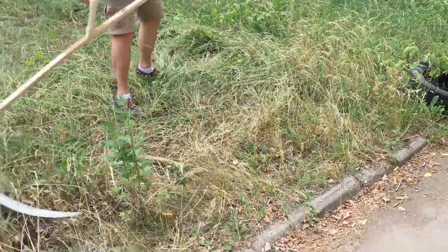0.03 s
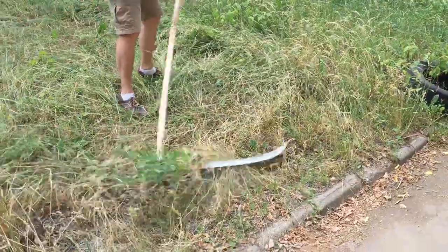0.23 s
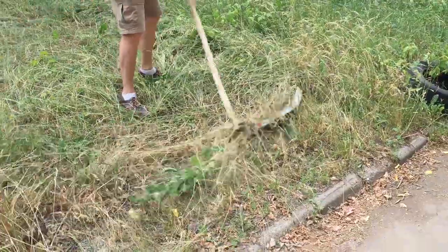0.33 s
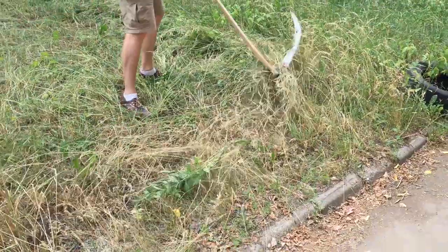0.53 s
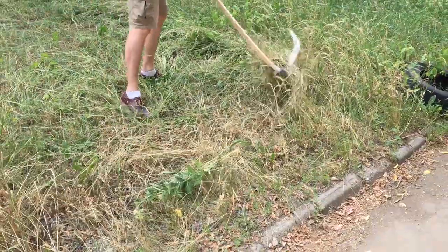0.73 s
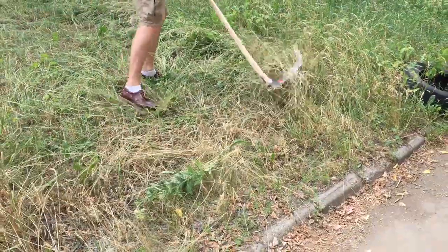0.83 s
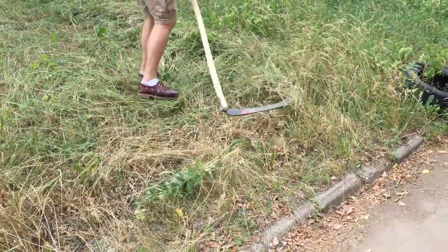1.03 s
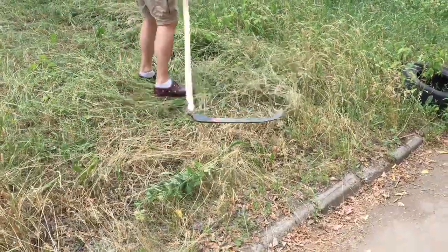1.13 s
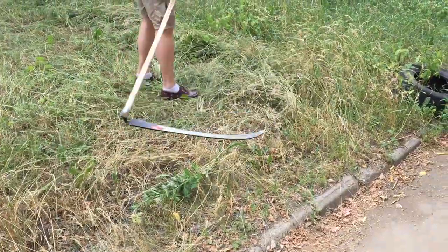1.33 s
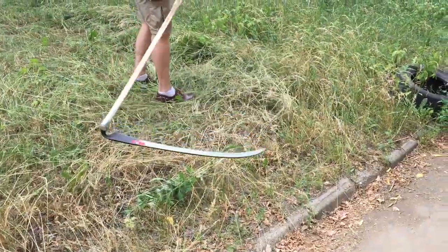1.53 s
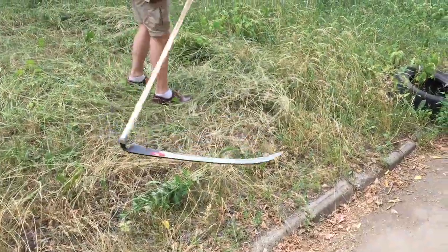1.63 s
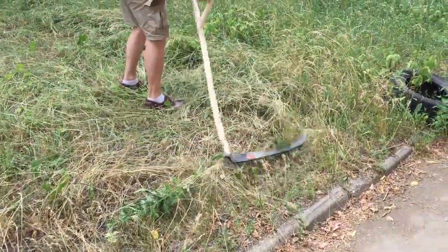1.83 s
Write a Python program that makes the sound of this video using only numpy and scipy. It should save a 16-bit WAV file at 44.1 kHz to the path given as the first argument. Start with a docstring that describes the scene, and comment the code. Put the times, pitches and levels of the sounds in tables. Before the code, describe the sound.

A scythe swishes through dry grass, snapping stems, then rustles faintly as it draws back.

```python
"""Wind bumps softly on the microphone over a low outdoor hum. A scythe sweeps into dry grass and weeds:
stalks brush the blade in a swelling swish and bow the steel into a faint ring. At the height of the
stroke, around 0.35 s, stems snap sharply and the thick ones knock on the blade. The swish dies away by
0.8 s, then the grass rustles and crackles as the blade is drawn back."""
import sys
import numpy as np
from scipy import signal
from scipy.fft import rfft, irfft
from scipy.io import wavfile
from scipy.ndimage import uniform_filter1d, map_coordinates

SR = 44100
rng = np.random.default_rng(int(sys.argv[2]) if len(sys.argv) > 2 else 0)


def master(y):
    """Save y as 16-bit WAV."""
    cut = np.clip(np.atleast_2d(y).T, -1, 1)
    pcm = np.round(cut * 32767)  # scale
    wavfile.write(sys.argv[1], SR, pcm.astype(np.int16))


N = 83790


def amp(db):
    return 10 ** (np.asarray(db) / 20)


def unit_rms(x):
    return x / np.sqrt(np.mean(x ** 2) + 1e-20)


def automation(table, column):
    """One column of a table of timed breakpoints, drawn out to every sample."""
    rows = np.array(table)
    return np.interp(np.arange(N) / SR, rows[:, 0], rows[:, column])


def equalise(x, curve, outside_db=None):
    """EQ through (Hz, dB) points; beyond them the end gains hold unless outside_db is given."""
    hz, db = np.transpose(curve)
    log_hz = np.log(np.fft.rfftfreq(N, 1 / SR) + 1)
    gain_db = np.interp(log_hz, np.log(hz), db, outside_db, outside_db)
    return irfft(rfft(x) * amp(gain_db), N)


def coloured(x, curve):
    """A band of x shaped by an EQ curve, at unit RMS."""
    return unit_rms(equalise(x, curve, outside_db=-60))


def patchy(x, depth_db, frames, bins, size=256):
    """Random louder and softer patches over time and frequency, at unit RMS."""
    spectra = signal.stft(x, nperseg=size)[2]
    patches = uniform_filter1d(rng.standard_normal(spectra.shape), bins, axis=0)
    patches = unit_rms(uniform_filter1d(patches, frames, axis=1))
    return unit_rms(signal.istft(spectra * amp(depth_db * patches), nperseg=size)[1][:N])


def resonate(x, hz, width_hz):
    """A single resonance with a gain of about 1 at its centre."""
    carrier = np.exp(2j * np.pi * hz * np.arange(1, len(x) + 1) / SR)
    pole = np.exp(-np.pi * width_hz / SR)
    return 2 * (carrier * signal.lfilter([1 - pole], [1, -pole], x / carrier + 1e-18)).real


def place(mix, start_s, sound):
    part = mix[round(start_s * SR):][:len(sound)]
    part += sound[:len(part)]


def outdoor_hum():
    """A low, steady bed of distant outdoor noise."""
    # Each row: frequency in Hz, relative level in dB.
    spectrum = [(18, -29), (30, -3), (114, -4.5), (272, -4.5), (363, -12), (798, -15.5), (1500, -20.5),
                (1620, -45), (1950, -48.5), (6350, -57), (15900, -33)]
    bed = coloured(rng.standard_normal(N), spectrum)
    return amp(-60.5) * patchy(bed, depth_db=0.92, frames=14, bins=2)


def wind():
    """Low, lumpy buffeting on the microphone, dulled by its cover."""
    # Each row: time in seconds, gust level in dB ahead of the cover.
    gusts = [(0.0, -73), (0.036, -48), (0.088, -69), (0.116, -58), (0.2, -62), (0.238, -51), (0.268, -66),
             (0.37, -55), (0.396, -63), (0.518, -54.5), (0.534, -74), (0.566, -53.5), (0.624, -53.5),
             (0.714, -58), (0.756, -51), (0.776, -57), (1.1, -62), (1.126, -42.5), (1.142, -35),
             (1.164, -76), (1.19, -45), (1.27, -51.5), (1.3, -39), (1.354, -69), (1.406, -49.5),
             (1.438, -70), (1.512, -53.5), (1.55, -61), (1.708, -56.5), (1.74, -73), (1.804, -58),
             (1.852, -45), (1.878, -56), (1.9, -37.5)]
    centre_hz, width_hz = 74.7, 51
    rumble = resonate(rng.standard_normal(N), centre_hz, width_hz)
    rumble = resonate(rumble, centre_hz, 2 * width_hz)
    # Compress the rumble so that the gusts shape the bumps.
    power = uniform_filter1d(rumble ** 2, size=700) + 0.018 * np.mean(rumble ** 2)
    rumble = unit_rms(rumble / np.sqrt(power))
    cover = signal.butter(3, [30, 170], "band", fs=SR, output="sos")
    return signal.sosfiltfilt(cover, amp(automation(gusts, 1)) * rumble)


def stalk_friction():
    """Stalks brushing steel: tiny uneven ticks in noise, streaked with narrow, lingering whistles."""
    ticks_per_s, spread_db, tick_share = 2700, 2, 0.44
    sizes = amp(spread_db * np.minimum(rng.exponential(1, N), 5))
    contacts = sizes * (rng.random(N) < ticks_per_s / SR)
    ticks = np.convolve(contacts, np.exp(-np.arange(40) / 7.1))[:N] * rng.standard_normal(N)
    texture = tick_share * unit_rms(ticks) + (1 - tick_share) * rng.standard_normal(N)
    return patchy(texture, depth_db=4, frames=3, bins=1, size=1024)


def ground_echo(rustle):
    """The rustle bounces off the ground; the delay shifts as the blade moves, like a light flanger."""
    # Each row: time in seconds, delay in ms, echo strength relative to the direct sound.
    bounce = [(0, .2, .1), (.06, .21, .35), (.12, .205, .65), (.19, .2, .5), (.26, .175, .4),
              (.33, .155, .4), (.42, .15, .1), (.7, .15, 0), (1.0, .086, .14), (1.5, .1, .18),
              (1.9, .1, .1)]
    read_at = np.arange(N) - automation(bounce, 1) * SR / 1000
    strength = automation(bounce, 2)
    echo = map_coordinates(rustle, [read_at], order=5)
    return (rustle + strength * echo) / np.sqrt(1 + strength ** 2)


def grass_swish():
    """Stalks brush the blade in three layers: bright fizz, mid rasp and woody body."""
    # The stroke and the draw back. Each row: time in seconds, then fizz, rasp and body levels in dB.
    stroke = [(0, -55, -61.5, -84), (.027, -56, -58, -64), (.05, -55.5, -67, -73.5),
              (.125, -54.5, -61.5, -69), (.16, -55, -57, -63.5), (.195, -41, -46.5, -55.5),
              (.25, -39, -44.5, -52), (.29, -33, -41, -44), (.33, -32.5, -40, -37), (.342, -28.5, -34, -37),
              (.365, -33, -34.5, -33.5), (.385, -32.5, -35, -39), (.40, -36, -39.5, -39.5),
              (.425, -36.5, -36, -39.5), (.455, -40, -41, -43), (.486, -35.5, -37.5, -44),
              (.535, -42.5, -44.5, -50.5), (.575, -40.5, -42.5, -48), (.625, -43.5, -47.5, -56.5),
              (.75, -54.5, -58, -66), (.80, -62, -67.5, -70), (.89, -65, -68.5, -68.5),
              (1.09, -63, -68, -77), (1.2, -58.5, -68, -72.5), (1.41, -62, -68.5, -74.5),
              (1.44, -61, -59.5, -62), (1.476, -50.5, -64, -76), (1.53, -63.5, -71.5, -75.5),
              (1.65, -65, -70, -72), (1.70, -71, -72, -78), (1.73, -63.5, -69.5, -74),
              (1.77, -75.5, -75.5, -77), (1.9, -72.5, -72.5, -70.5)]
    # The tone of each layer. Each row: frequency in Hz, relative level in dB.
    fizz_eq = [(3300, -36), (4700, -7.5), (6200, -2), (7500, -3), (9000, 0.5), (12000, -2), (14000, -2),
               (15900, -4.5)]
    rasp_eq = [(1300, -53), (1900, -5), (2400, -2), (3100, -1), (3500, -4), (4000, -2.5), (5000, -5),
               (7000, -33.5)]
    body_eq = [(300, -25.5), (550, -11.5), (850, 1), (1200, -1.5), (1650, 2.5), (1950, -9.5), (2600, -23)]
    fizz = patchy(coloured(stalk_friction(), fizz_eq), depth_db=1.3, frames=20, bins=5)
    friction = stalk_friction()
    rasp = patchy(coloured(friction, rasp_eq), depth_db=0.87, frames=10, bins=2)
    body = patchy(coloured(friction, body_eq), depth_db=1.37, frames=8, bins=2)
    layers = [ground_echo(fizz), rasp, body]
    return sum(amp(automation(stroke, column)) * layer for column, layer in enumerate(layers, 1))


def stem_snaps():
    """Each stem cracks: a broad tick, a short pitched burst, a crumbly tail and a ground bounce."""
    # Each row: start in seconds, burst level in dB, pitch in Hz, burst length in ms,
    # tick level in dB relative to the burst.
    snaps = [(0.0286, -39.5, 2670, 0.37, 2), (.3381, -15, 12000, 0.43, 0), (0.3382, -19, 13400, .3, -10),
             (.3399, -22, 13500, .25, 0), (0.3375, -26, 6000, 0.28, -4), (0.339, -21.5, 2470, 0.25, -10),
             (0.364, -29, 12400, 0.22, -8), (.38115, -6.5, 8100, .135, -2), (.3814, -22, 2000, .3, -9),
             (0.8394, -40, 11800, 0.23, -4), (1.434, -43, 12500, 0.21, -3), (1.441, -44, 2470, .48, 5.5),
             (1.4345, -50, 4200, .3, -5), (1.452, -48, 3700, 0.33, -8), (1.458, -49, 3940, 0.29, -3),
             (1.4724, -38, 12500, 0.44, 2), (1.474, -42.5, 4300, 0.23, -3), (1.542, -50.5, 8450, 0.28, 3),
             (1.557, -50, 11500, .3, -6), (1.5785, -42.5, 9400, 0.64, -3), (1.6008, -45, 12800, .3, -7),
             (1.616, -47, 12600, .3, -10), (1.6244, -45, 12700, .3, -10), (1.6381, -43, 6300, 0.61, 3.5),
             (1.652, -48, 6000, 0.23, -2), (1.6561, -42, 12400, 0.21, 0), (1.6683, -41, 12600, 0.26, -4),
             (1.6846, -57, 13000, 0.18, 11), (1.721, -59, 11800, .3, -5), (1.73235, -31.5, 9400, .28, -1),
             (1.7324, -37, 6000, .3, -9), (1.7326, -47, 3000, .5, -9), (1.741, -47, 9000, .25, -3),
             (1.7528, -54, 9000, .2, 2), (1.7915, -52.5, 6000, 0.081, 0), (1.849, -54, 9100, .2, -3),
             (1.8755, -42, 8300, 0.15, -4)]
    tail_db, tail_decay_s = -17, 0.0018
    bounce_db, bounce_delay_s = -6, 0.00024
    out, t = np.zeros(N), np.arange(800) / SR
    pulse = np.exp(-((t - 0.00007) / 0.000026) ** 2)
    tick = np.diff(pulse, prepend=0)
    tick /= tick.max()
    for start_s, db, hz, length_ms, tick_db in snaps:
        age = 2 * t / (length_ms / 1000)  # the burst peaks at age 1
        burst = np.sin(2 * np.pi * hz * t) * age * np.exp(1 - age)
        crumbs = np.diff(rng.standard_normal(len(t) + 1))
        tail = amp(tail_db) * crumbs * np.exp(-t / tail_decay_s)
        place(out, start_s, amp(db) * (burst + amp(tick_db) * tick + tail))
    return out + amp(bounce_db) * np.roll(out, round(bounce_delay_s * SR))


def blade_rings():
    """Stalks dragged along the edge bow one mode of the steel for a moment."""
    # Each row: start in seconds, length in seconds, level in dB, pitch in Hz.
    rings = [(.17, 0.11, -50, 1778), (.18, 0.075, -57, 962), (.255, 0.047, -46, 2460),
             (.29, 0.06, -49, 6130), (.325, 0.049, -42, 2407), (0.422, 0.092, -40, 1652),
             (.425, 0.022, -41, 2373), (.47, .045, -42, 2885), (.11, 0.12, -54, 4790),
             (.485, 0.023, -40.5, 3270), (.555, 0.025, -47, 2510), (.69, 0.098, -64, 2440),
             (.65, 0.094, -61.5, 2885), (.92, 0.07, -70, 2213), (1.025, 0.043, -65, 2370),
             (1.2, 0.056, -66, 2970), (1.265, .07, -70.5, 2986), (1.013, 0.083, -74, 4280),
             (1.2, 0.023, -67, 2140)]
    out = np.zeros(N)
    for start_s, length_s, db, hz in rings:
        mode = resonate(rng.standard_normal(8000), hz, width_hz=14)
        tone = unit_rms(mode[2000:][:round(length_s * SR)])  # skip the build-up
        swell = np.sqrt(np.hanning(len(tone)))
        place(out, start_s, amp(db) * swell * tone)
    return out


def stem_thuds():
    """Thick stems struck by the blade send dull knocks through steel and shaft."""
    # Each row: start in seconds, level in dB, pitch in Hz, seconds to fall by 60 dB.
    thuds = [(.30, -35, 1100, 0.14), (.338, -25.5, 1132, .06), (.345, -37, 241, 0.21),
             (.352, -29.5, 1329, .1), (.414, -30, 840, 0.046), (.32, -38, 318, 0.065),
             (.575, -34, 1430, 0.035)]
    attack_s = 0.006
    out, t = np.zeros(N), np.arange(6000) / SR
    for start_s, db, hz, t60 in thuds:
        roughness = 1 + 0.69 * unit_rms(uniform_filter1d(rng.standard_normal(len(t)), size=200))
        envelope = amp(db - 60 * t / t60) * np.minimum(t / attack_s, 1)
        place(out, start_s, envelope * roughness * np.sin(2 * np.pi * hz * t))
    return out


def scene():
    """The scythe, the wind and the hum in one mono mix."""
    scythe = grass_swish() + blade_rings() + stem_snaps() + stem_thuds()
    return (scythe + wind() + outdoor_hum())[None]


def record(dry):
    """The microphone housing colours the mix, and a steep low-pass cuts it off at 16 kHz."""
    # Each row: frequency in Hz, gain in dB.
    housing_eq = [(22, -16), (48, 1), (4300, -1.5), (4900, -3), (5600, 1), (9700, -0.5), (10500, -4.5),
                  (11300, 0), (16000, -1)]
    low_pass = signal.firwin(511, 16000, window=("kaiser", 9), fs=SR)
    return signal.oaconvolve(equalise(dry, housing_eq), low_pass[None], "same")


dry = scene()
out = record(dry)
master(out)
```